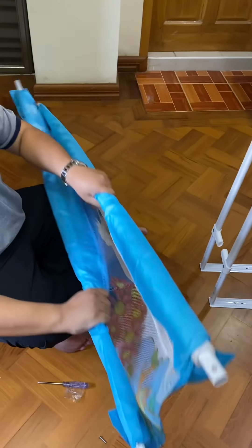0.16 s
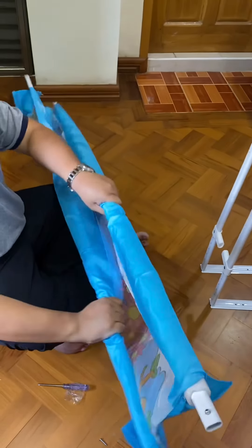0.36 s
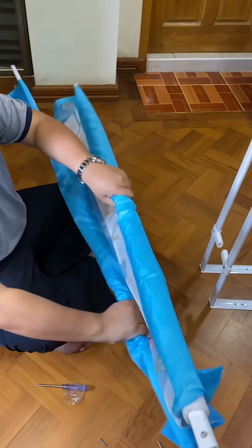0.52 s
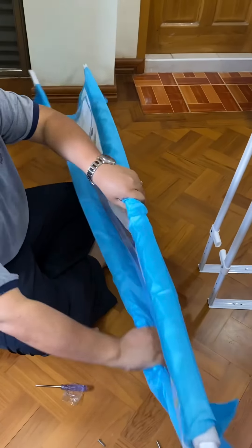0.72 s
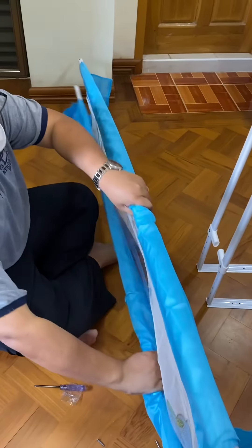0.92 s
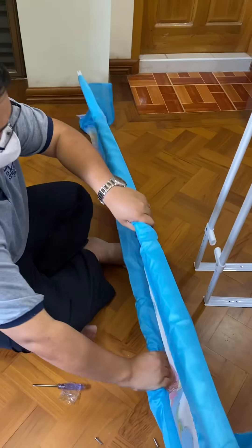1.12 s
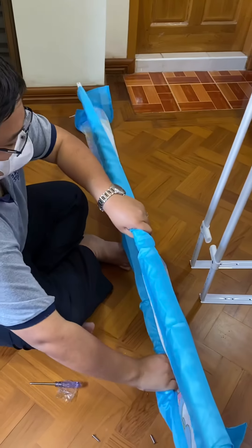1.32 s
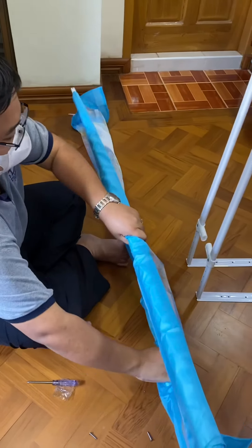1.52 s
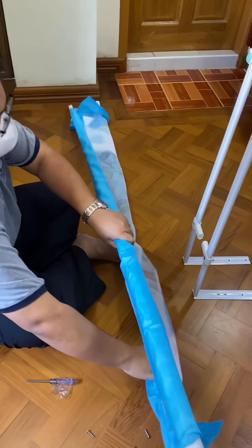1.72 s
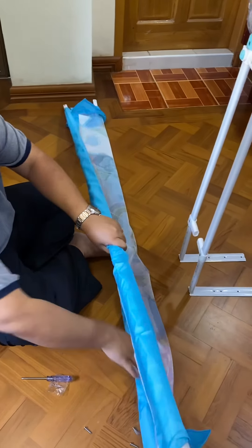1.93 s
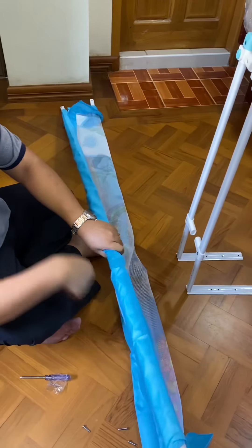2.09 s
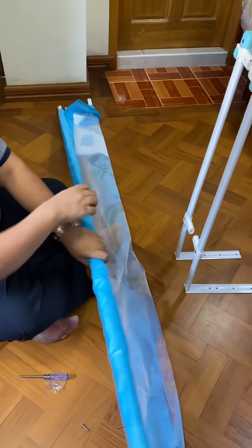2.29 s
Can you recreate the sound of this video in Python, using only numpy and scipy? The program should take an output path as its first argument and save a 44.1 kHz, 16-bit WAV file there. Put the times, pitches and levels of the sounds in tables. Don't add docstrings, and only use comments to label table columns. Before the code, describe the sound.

Thin hollow metal tubes in fabric sleeves clank in a bare wooden-floored room. Cloth rustles and tubes buzz faintly before a loud bright clack at 0.23 s. Rustling swells near 1.0 s, with a duller knock at 1.06. Sharper taps come at 1.5, a floor clatter at 1.72, a double clank at 1.83 and a soft knock at 1.96. A tiny fabric snap follows over faint low hum.

```python
import sys
import numpy as np
from scipy import signal
from scipy.fft import rfft, irfft, next_fast_len
from scipy.io import wavfile
from scipy.ndimage import uniform_filter1d, map_coordinates

SR = 44100
rng = np.random.default_rng(int(sys.argv[2]) if len(sys.argv) > 2 else 0)


def digitize_waveform(pressure):
    field = np.atleast_2d(pressure).T
    bounded = np.clip(field, -1, 1)
    quanta = np.round(bounded * 32767).astype(np.int16)
    wavfile.write(sys.argv[1], SR, quanta)


def volts_from_decibels(level):
    exponent = np.asarray(level, float) / 20
    return 10 ** exponent


N = 103635


def unit(x):
    return x / np.sqrt(np.mean(x ** 2) + 1e-20)


def along(points, hz):
    f, v = np.transpose(points)
    return np.interp(np.log(hz + 1), np.log(f + 1), v)


def curve(rows):
    return np.interp(np.arange(N) / SR, *np.transpose(rows))


def wobble(rate, n=N):
    knots = rng.standard_normal(int(n * rate / SR) + 4)
    return map_coordinates(knots, [np.arange(n) * rate / SR])


def filtered(x, response):
    n = x.shape[-1]
    m = next_fast_len(n + 8192)
    return irfft(rfft(x, m) * response(np.fft.rfftfreq(m, 1 / SR)), m)[..., :n]


def noise(spectrum, n=None):
    treble_hz, db_per_octave = 8340, -16

    def colour(hz):
        octaves_above = np.log2(np.maximum(hz / treble_hz, 1))
        return volts_from_decibels(along(spectrum, np.minimum(hz, treble_hz)) + db_per_octave * octaves_above)

    return unit(filtered(rng.standard_normal((2, n or N)), colour))


def tube_ring(kind, t):
    # frequency in Hz, level in dB, free t60 in s.
    bright = [(1847, -11, 0.33), (2418, -5, 0.45), (3530, -7, 0.34), (3900, -13, .25), (3980, -6, .29),
              (4065, -10, .25), (4600, -22, .15), (5710, -7, 0.17), (6070, -3.5, 0.38), (6304, -28, 0.26),
              (6400, -15, 0.31), (6790, -16, 0.21), (7330, -17, 0.17)]
    end = [(1598, -5, 0.14), (1864, -5, 0.47), (2680, -8.5, 0.57), (3660, -13.5, 0.62), (4750, -5.5, 0.22),
           (5873, -10, 0.43), (5940, -13, 0.44), (6250, -8.5, 0.26), (6770, -12, 0.24), (7000, -7, 0.14),
           (7843, -17, 0.18), (816, -11.5, 0.16)]
    tap = [(1928, -3, 0.45), (1597, -4, 0.27), (1250, -15, 0.18), (2594, -6, 0.34), (2920, -9, 0.12),
           (3750, -1.5, 0.19), (4366, -28, 0.2), (4850, -12, .27), (5480, -20, 0.24), (6040, -5, 0.44),
           (6540, -5, 0.23), (6870, -6, 0.27), (7270, -9.5, 0.33), (8300, -11, .25)]
    floor = [(957, -9, 0.16), (1127, -2, 0.21), (1236, -2.5, 0.2), (1750, -17, 0.071), (1906, 0, 0.17),
             (2410, -3, 0.3), (2696, 3.5, .1), (3290, -5.5, 0.28), (3640, -2.5, 0.38), (5800, -12, .24),
             (5910, -9, 0.25), (6368, -9, 0.17)]
    pair = [(1830, -6, 0.23), (2554, -7.5, .5), (2690, -5.5, 0.54), (3410, -5.5, 0.38), (3540, -6, .4),
            (3683, -2.5, 0.52), (3870, -7, 0.35), (4120, -26, 0.28), (4670, -4.5, 0.25), (5380, -7, 0.5),
            (5780, -7, 0.41), (6200, -5.5, .3), (6820, -12, 0.27)]
    soft = [(1132, 0.5, 0.34), (1410, -14, .2), (1950, -1, 0.32), (2670, 0, 0.31), (3660, -2.5, 0.42),
            (620, -13, 0.087)]
    modes = dict(bright=bright, end=end, tap=tap, rebound=tap, floor=floor, pair=pair, soft=soft)
    damping, longest_s = 0.35, 0.62
    blur_rad, blur_rate = 1.16, 97
    rise_s = 0.0013
    ring = 0
    for hz, db, t60 in modes[kind]:
        decay = volts_from_decibels(db - 60 * t / (damping * min(t60, longest_s)))
        ring = ring + decay * np.sin(2 * np.pi * hz * t + blur_rad * wobble(blur_rate, len(t)))
    return ring * (1 - np.exp(-t / rise_s))


def hollow_knock(kind, db, hz, t):
    knock_t60 = {"bright": 0.027, "end": 0.047, "tap": 0.013, "rebound": 0.049, "floor": 0.041, "pair":
                 0.029, "soft": 0.015}
    sag, sag_s = 0.11, 0.011
    bent_t = t - sag * (t - sag_s * (1 - np.exp(-t / sag_s)))
    knock = volts_from_decibels(db - 60 * t / knock_t60[kind]) * np.sin(2 * np.pi * hz * bent_t)
    thump_hz, thump_db, thump_s = 444 * rng.uniform(0.656, 1.344), -29.5, 0.05
    return knock + volts_from_decibels(thump_db - 60 * t / thump_s) * np.sin(2 * np.pi * thump_hz * t)


def contact_crack(kind, t):
    crack_colours = {"bright": [(150, -37), (250, -22), (2380, -9.5), (5010, -12.5), (5930, -7),
                     (9500, -24.5), (12400, -65.5), (20900, -120)], "end": [(150, -48), (250, -11),
                     (642, -21), (1630, -6), (5930, -18), (9500, -24.5), (12400, -53), (20900, -120)],
                     "tap": [(250, -30), (800, -15.5), (1400, -13), (1900, -10), (2200, -11), (6700, -21),
                     (9500, -28)], "floor": [(150, -58), (250, -19), (1780, -7.5), (2110, -19),
                     (5750, -15.5), (9500, -34.5), (12400, -70.5), (20900, -120)], "pair": [(150, -53),
                     (250, -16.5), (2610, -3), (3080, -9), (3530, -3), (9500, -15), (12400, -45),
                     (20900, -120)], "soft": [(150, -50), (250, -17.5), (1900, -4), (5990, -19),
                     (8000, -32), (10400, -55), (17600, -120)]}
    colour = crack_colours.get(kind, crack_colours["tap"])
    return noise(colour, len(t))[0] * volts_from_decibels(-60 * t / 0.024)


def tail():
    # frequency in Hz, t60 in s.
    room_t60 = [(300, 0.43), (1500, 0.34), (5000, 0.42), (11000, 0.25)]
    gap_s = 0.004
    hz, t, z = signal.stft(rng.standard_normal((2, SR // 2)), SR, nperseg=256)
    z = z * volts_from_decibels(-60 * t / along(room_t60, hz)[:, None])
    h = signal.istft(z, SR, nperseg=256)[1]
    return np.pad(h / np.linalg.norm(h[0]), ((0, 0), (round(gap_s * SR), 0)))


def clanks():
    blows = {"bright": [(.2333, -21.5, 3, -1, 3900), (.2353, -15, -4, 4, 3960), (.2366, -12, -9, 9.5, 2637),
             (.2405, -21.5, 1, 10, 1813), (.2475, -22.5, 4, 2, 2450), (.2785, -31.5, 3.5, -8, 2400)],
             "end": [(1.0603, -24, -10, 10.5, 1986), (1.0640, -24, 0, 0, 1950), (1.0690, -27, 2, 9, 1750),
             (1.080, -32.5, 6, -5, 1720)], "tap": [(1.4938, -19, -3.5, 15.5, 1920),
             (1.4942, -25.5, -15, 16.5, 2850), (1.8293, -18, -0.5, 12, 1820)],
             "rebound": [(1.4975, -25.5, 2, 5, 1998), (1.5090, -33, -3, 16, 2010)],
             "floor": [(1.7182, -19.5, -0.5, 7, 1843), (1.7249, -23, -2.5, 11, 1860),
             (1.7278, -25, -3, 3, 2700), (1.7335, -26, -4, 7, 1274), (1.7375, -40.5, -12, 11, 1900),
             (1.7445, -38, -1, 11, 1180)], "pair": [(1.8352, -18, -4.5, 8, 2810),
             (1.8385, -19, -1.5, 8, 2814), (1.846, -20.5, 0.5, -4, 2300), (1.893, -29, 2, 15, 3640)],
             "soft": [(1.9565, -24.5, -2, 7, 1500), (1.9585, -30.5, -5, 8.5, 783),
             (1.964, -32.5, -2.5, 3, 1250), (1.978, -34, -3.5, 11, 1920)]}
    room_db, knock_send = 2, 0.1
    out = np.zeros((2, N + 2 * SR))
    t = np.arange(SR // 3) / SR
    for kind, rows in blows.items():
        for s, db, ring_db, knock_db, knock_hz in rows:
            onset = volts_from_decibels(db) * (1 - np.exp(-t / 0.00043))
            struck = onset * (volts_from_decibels(ring_db - 7) * tube_ring(kind, t) + contact_crack(kind, t))
            knock = onset * volts_from_decibels(-4.0) * hollow_knock(kind, knock_db, knock_hz, t)
            sent = struck + knock_send * knock
            wet = volts_from_decibels(room_db) * signal.fftconvolve(sent[None], tail(), axes=1)
            wet[0, :len(t)] += struck + knock
            out[:, round(s * SR):][:, :wet.shape[1]] += wet
    return out[:, :N]


def sparks():
    # start in s, level in dB, t60 in s, lowest Hz.
    bursts = [
        (1.8293, -41, .012, 14600),
        (2.0305, -60, .012, 9000),
        (2.044, -61, .008, 10500),
    ]
    t = np.arange(N) / SR
    out = np.zeros(N)
    for s, db, t60, low_hz in bursts:
        burst = volts_from_decibels(db - 60 * np.maximum(t - s, 0) / t60) * (t >= s) * rng.standard_normal(N)
        out += filtered(burst, lambda hz: 3 * (hz > low_hz) * (hz < 16000))
    return out


def cloth():
    # time in s, level in dB.
    rustle_level = [(0, -47), (.1, -49), (.22, -47), (.5, -55), (.858, -57.5), (.868, -50.5), (.91, -54.5),
                    (1.0, -41.5), (1.06, -46.5), (1.25, -59), (1.35, -63), (1.36, -57.5), (1.42, -55),
                    (1.48, -44.5), (1.7, -57.5), (2.1, -64), (2.25, -63), (2.35, -56)]
    # frequency in Hz, level in dB per Hz.
    rustle_colour = [(240, -5), (400, -4), (766, -4.5), (947, -9.5), (4180, -4), (9500, -14), (12400, -40),
                     (20900, -120)]
    # frequency in Hz, width in Hz, level in dB.
    shaken_modes = [(1126, 70, -3), (1930, 130, -4), (2740, 130, -10.5), (3688, 80, -3)]
    # time in s, level in dB.
    buzz_level = [(0, -49.5), (.12, -52.5), (.2, -48.5), (.3, -67)]
    grain_db = 1.2 * wobble(300) + 1.34 * wobble(24.86)
    rub = unit(noise(rustle_colour) * volts_from_decibels(grain_db))

    def tube(f):
        return sum(volts_from_decibels(db) * 1j * f * w / (c * c - f * f + 1j * f * w) for c, w, db in shaken_modes)

    buzz = unit(filtered(rng.standard_normal((2, N)), tube)) * volts_from_decibels(3.5 * wobble(30))
    return volts_from_decibels(curve(rustle_level)) * rub + volts_from_decibels(curve(buzz_level)) * buzz


def snaps():
    # start in s, level in dB.
    ticks = [(2.031, -44.5), (2.205, -60), (.227, -62), (1.36, -50), (1.4176, -62), (1.45, -43),
             (1.711, -43)]
    t = np.arange(N) / SR
    shape = sum(volts_from_decibels(db - 60 * np.maximum(t - s, 0) / 0.03) * (t >= s) for s, db in ticks)
    return shape * noise([(1500, -5), (6000, 0.0), (8000, -6)])


def room_tone():
    # frequency in Hz, level in dB per Hz.
    air_colour = [(20, -41), (40, 1.5), (90, -1), (360, -11.5), (650, -19), (2200, -24.5), (5000, -31.5),
                  (9000, -43.5)]
    # frequency in Hz, level in dB rms, wander in dB.
    hum_lines = [(59, -50, 1.5), (83, -48, 2.2), (165, -60, 3)]
    t = np.arange(N) / SR
    hum = 0
    for hz, db, wander_db in hum_lines:
        level = np.sqrt(2) * volts_from_decibels(db + wander_db * wobble(4.75))
        hum = hum + level * np.sin(2 * np.pi * (hz * t + 0.023 * wobble(4.9)))
    return volts_from_decibels(-47.5) * noise(air_colour) + hum


def masked(mid):
    mask_db, soft_db = 21, 2.5
    hz, _, z = signal.stft(mid, SR, nperseg=1024)
    power = np.abs(z) ** 2 + 1e-20
    body = power[(hz > 1000) & (hz < 7000)].mean(axis=0)
    smooth = np.abs(uniform_filter1d(power, size=16, axis=0))
    over_db = 10 * np.log10(smooth / body + 1e-12) + mask_db
    keep = 1 / (1 + np.exp(np.clip(-over_db / soft_db, -30, 30)))
    treble = ((hz > 8300) & (hz < 14000))[:, None]
    return signal.istft(z * np.where(treble, keep, 1), SR, nperseg=1024)[1][:N]


def scene():
    # frequency in Hz, side level in dB.
    side_high = [(600, -1.5), (1700, -9.5), (2700, 2.5), (3900, -4), (5000, 0), (6200, -5.5), (9000, 2),
                 (16000, 11)]
    # frequency in Hz, side over mid in dB.
    side_low = [(60, -42), (125, -35), (250, -17.5), (600, -7)]
    # frequency in Hz, mid level in dB.
    mid_colour = [(4300, -1.5), (5050, -7), (5500, 0.5), (9500, 0.5), (11000, 0.5), (12500, -1.5),
                  (16000, -43)]
    shared = 0.45
    near, diffuse = clanks() + cloth() + snaps() + room_tone()

    def side_gain(hz):
        return volts_from_decibels(np.where(hz < 600, along(side_low, hz), along(side_high, hz)))

    side = filtered(near, lambda hz: 1j * shared * side_gain(hz))
    side = side + filtered(diffuse, lambda hz: np.sqrt(1 - shared ** 2) * side_gain(hz))
    mid = masked(filtered(near, lambda hz: volts_from_decibels(along(mid_colour, hz)))) + sparks()
    return np.array([mid + side, mid - side])


def roll_off(x):
    return signal.sosfilt(signal.butter(12, 15800, fs=SR, output="sos"), x)


def record(dry):
    return roll_off(dry)


dry = scene()
out = record(dry)
digitize_waveform(out)
```